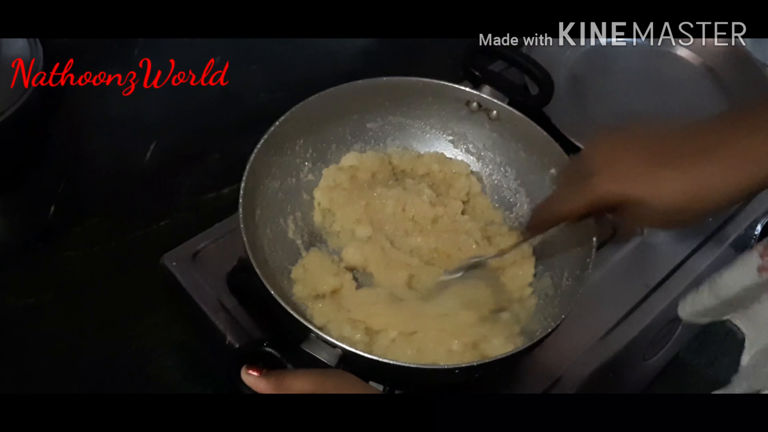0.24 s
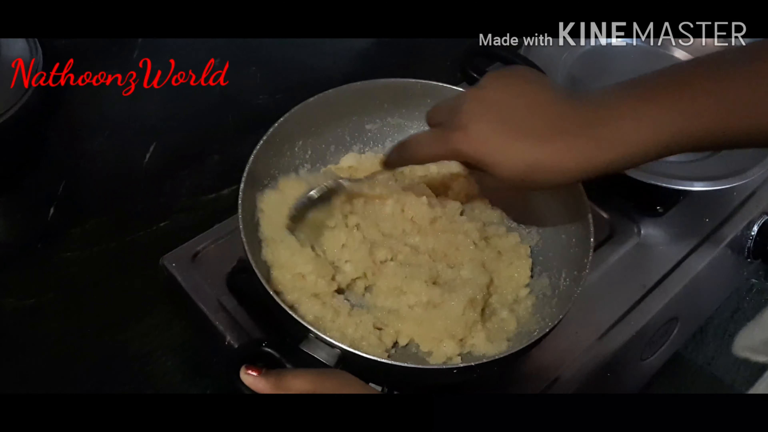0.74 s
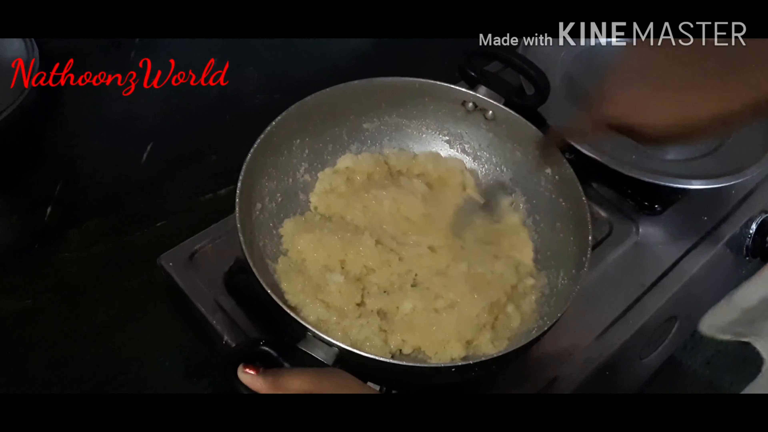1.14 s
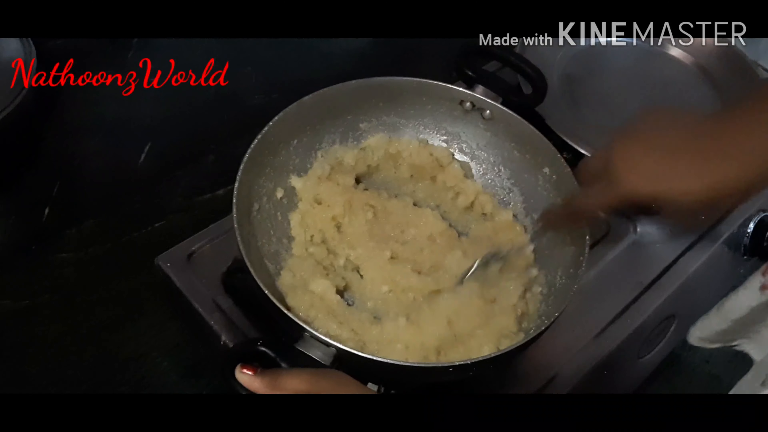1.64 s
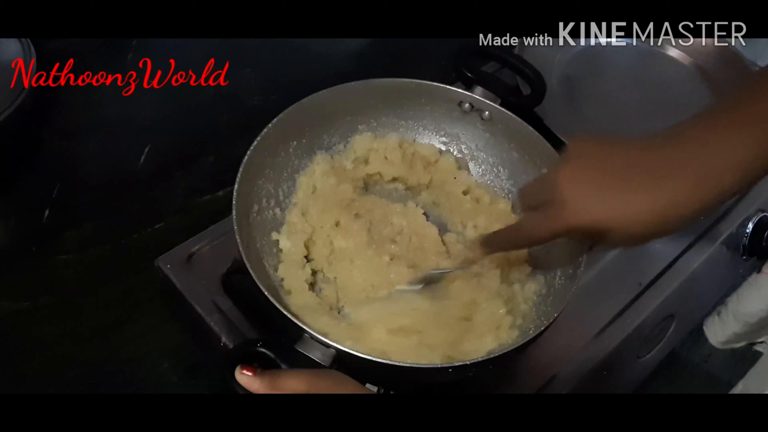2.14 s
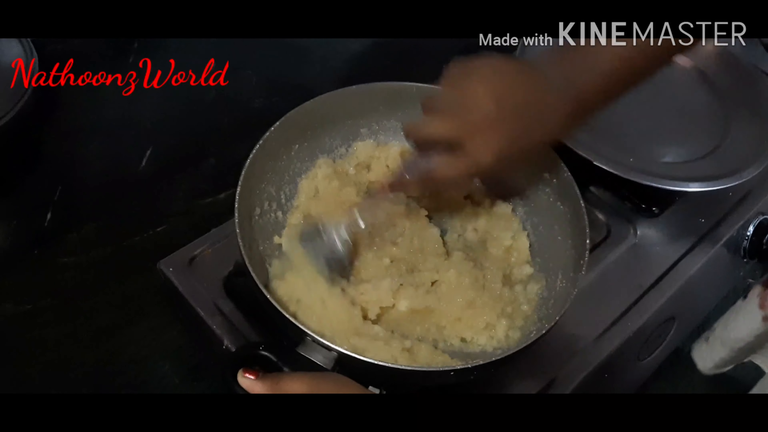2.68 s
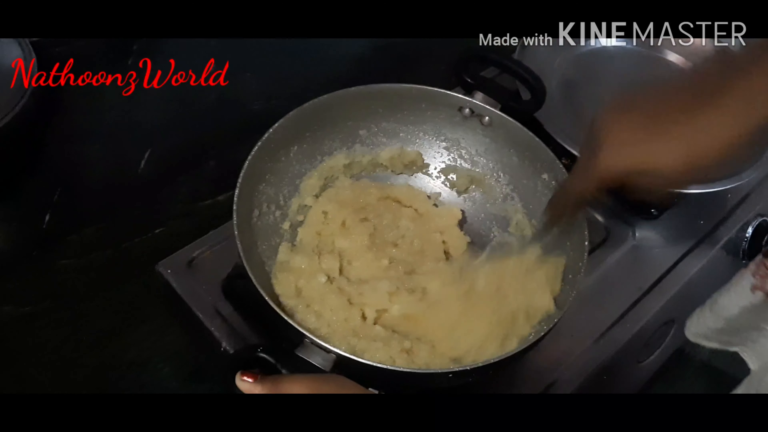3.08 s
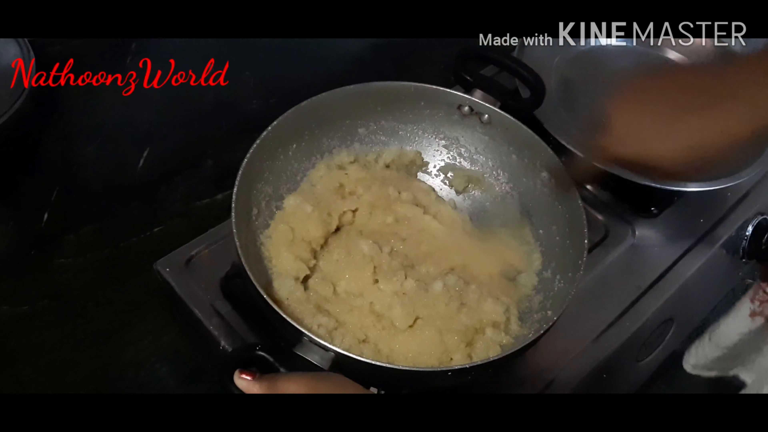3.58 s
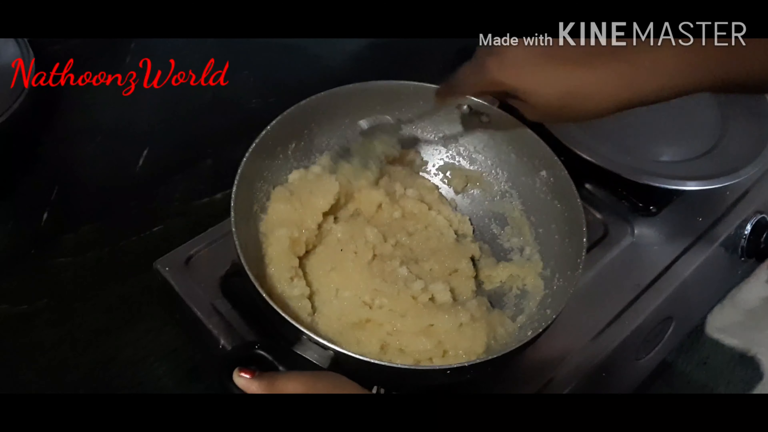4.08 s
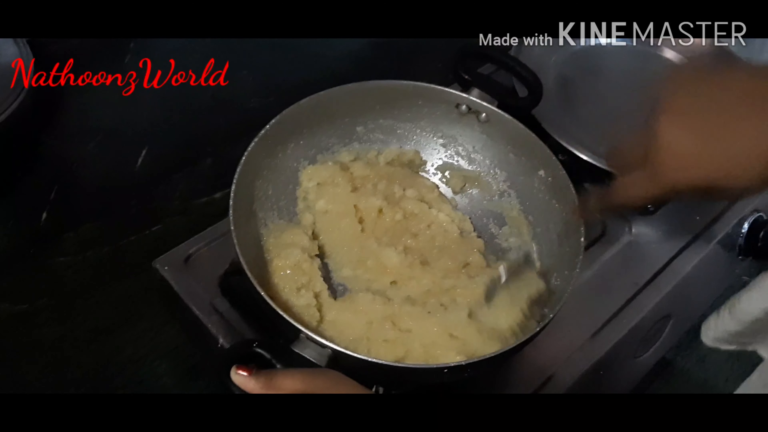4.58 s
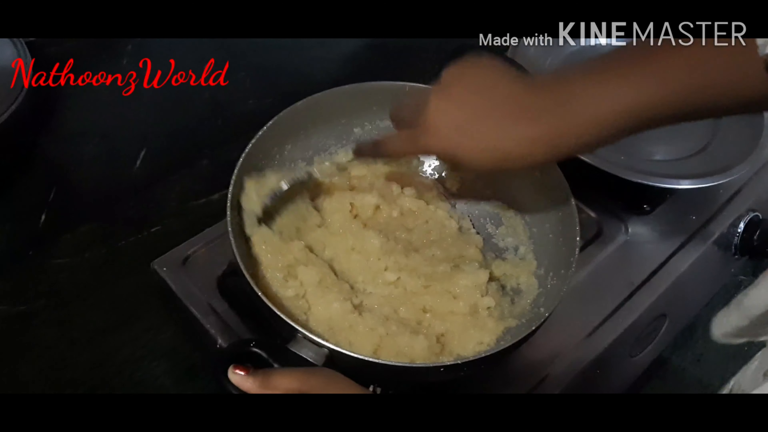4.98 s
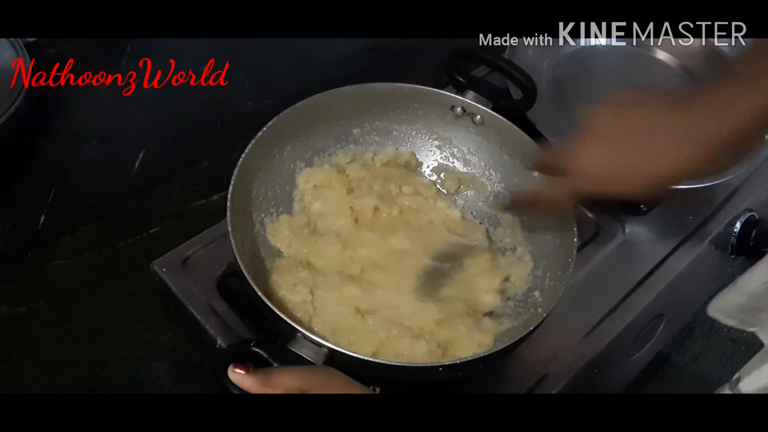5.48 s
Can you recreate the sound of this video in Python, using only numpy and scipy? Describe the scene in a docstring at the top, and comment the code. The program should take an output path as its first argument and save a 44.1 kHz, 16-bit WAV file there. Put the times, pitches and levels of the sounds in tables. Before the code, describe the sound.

A metal spoon briskly stirs thick, sticky semolina in a metal pan, recorded close in stereo in a small hard kitchen. Uneven pushes come three or four a second throughout: a dull knock with a faint metallic click, then a mid-pitched rasp, a muffled drag of paste and fine grit, swelling and easing off. The damped pan gives short, muted ringing. A firm knock lands at 0.5 s with a brief squawk; a tiny bright clink sits at 1.1 s, toward the right. The hardest knock comes at about 2.45 s. Rough judders squeak near 2.9 s, with small wet snaps at 3.0 and 3.35 s. Around 4.3 s the pan shifts with low thuds and a heavy knock; another snap follows at 4.4 s. Strong scraping strokes come at 4.7, 5.1 and 5.4 s. Dense short echoes, faint steady hiss and a barely audible low rumble lie underneath.

```python
"""Stirring thick semolina in a pan

A metal spoon stirs thick semolina in a pan on a kitchen stove, in uneven pushes, three or four a second.
Coloured noise bursts make the knocks, random tiny slips the rasp, drag and grit, wavering tones the judders.
These also ring the pan's damped modes; paste snaps and one bright clink skip the pan's ring.
All of them share the dense echoes of a small hard kitchen; faint room noise and a low rumble lie around."""
import sys
import numpy as np
from scipy import signal
from scipy.fft import rfft, irfft, next_fast_len
from scipy.io import wavfile
from scipy.ndimage import uniform_filter1d

SR = 44100
rng = np.random.default_rng(int(sys.argv[2]) if len(sys.argv) > 2 else 0)


def transcribe(u):
    """Save the signal u as a 16-bit wav file named by the first command-line argument.

    u: samples, shape (n,) or (channels, n), limited to [-1, 1]; the rate is SR.
    q: integer samples, one column per channel.
    """
    v = np.clip(np.atleast_2d(u).T, -1, 1)
    q = np.round(v * 32767).astype(np.int16)
    wavfile.write(sys.argv[1], SR, q)


N = 252379  # length in samples


def amp(db):
    """Turns decibels into a gain."""
    return 10 ** (np.asarray(db) / 20)


def evened(x):
    """Scales a sound to an rms of 1."""
    return x / np.sqrt(np.mean(x ** 2) + 1e-20)


def read(points, hz):
    """Reads a table of (frequency, value) between its points, on a log-frequency axis."""
    table_hz, value = np.transpose(points)
    return np.interp(np.log(hz + 1), np.log(table_hz + 1), value)


def sides(db):
    """Left and right gains for a level difference, left minus right."""
    return amp(np.array([[0.5], [-0.5]]) * db)


def add(mix, start_s, sound):
    """Mixes a stereo sound in at a given time, cut off at the end of the scene."""
    part = mix[:, max(round(start_s * SR), 0):][:, :sound.shape[1]]
    part += sound[:, :part.shape[1]]


def colour(x, points, size=2048):
    """Filters with the given spectrum; minimum phase, so nothing sounds ahead of its cause."""
    log_gain = np.log(amp(read(points, abs(np.fft.fftfreq(size, 1 / SR)))))
    taps = np.fft.ifft(np.exp(np.conj(signal.hilbert(log_gain)))).real
    return signal.oaconvolve(x, taps[None, :size // 2], axes=1)[:, :x.shape[1]]


def resonate(x, hz, width_hz):
    """One resonance with a gain of about 1 at its peak; a wider one dies faster."""
    r = np.exp(-np.pi * abs(width_hz) / SR)
    pole = r * np.exp(2j * np.pi * hz / SR)
    return 2 * signal.lfilter([1 - r], [1, -pole], x).real


def wander(rate_hz):
    """Smooth random movement with an rms of 1, mostly slower than the given rate."""
    hz = np.fft.rfftfreq(N, 1 / SR)[:4096]
    size = next_fast_len(N)
    spectrum = rfft(rng.standard_normal(size))[:len(hz)]
    return evened(irfft(spectrum / (1 + (hz / rate_hz) ** 4), size)[:N])


# How alike the two microphones hear noise.
# Each row: frequency in Hz, left-right correlation from 0 to 1.
LIKENESS = [(50, 0.083), (250, 0.98), (500, 0.87), (1000, 0.4), (2000, 0), (4000, 0), (15000, 0.0037)]


def pair_noise(size):
    """Noise at two microphones: alike in most of the bass, almost unrelated in the treble."""
    full = next_fast_len(size)
    a, b = rfft(rng.standard_normal((2, full)))
    same = np.clip(read(LIKENESS, np.fft.rfftfreq(full, 1 / SR)), -1, 1)
    left = same * a + np.sqrt(1 - same ** 2) * b
    return irfft(np.array([left, a]), full)[:, :size]


def burst(rise_s, size=2048):
    """A brief clatter of contact: noise that swells to its height in rise_s and dies."""
    u = np.arange(size) / SR / rise_s
    return u * np.exp(1 - u) * pair_noise(size)


# Spectrum of the room noise. Each row: frequency in Hz, relative level in dB per Hz.
QUIET_SPECTRUM = [(20, -29), (55, -49.5), (120, 3), (400, 3), (1200, 5), (2500, 2), (4000, -1), (4700, 1.5),
                  (6000, -13), (15000, -4.5)]


def room_quiet():
    """Faint steady room noise: coloured noise at one level."""
    return amp(-61) * evened(colour(pair_noise(N), QUIET_SPECTRUM))


# Spectrum of the rumble. Each row: frequency in Hz, relative level in dB per Hz.
RUMBLE_SPECTRUM = [(15, 4), (32, -43), (55, 13), (85, -5.5), (150, -29), (400, -45)]
# Swells of the rumble.
# Each row: middle in seconds, time from the middle to 1/e of the height in seconds, level in dB.
RUMBLE_SWELLS = [(1.0, 0.054, -56), (1.22, 0.11, -67), (1.58, 0.081, -63)]
RUMBLE_REST_DB = -73  # always present under the swells


def low_rumble():
    """A soft low rumble: deep noise that comes up in a few bell-shaped swells."""
    t = np.arange(N) / SR
    swell = amp(RUMBLE_REST_DB)
    for middle_s, half_s, db in RUMBLE_SWELLS:
        swell = swell + amp(db) * np.exp(-((t - middle_s) / half_s) ** 2)
    return swell * evened(colour(pair_noise(N), RUMBLE_SPECTRUM))


# How long the kitchen's echoes last. Each row: frequency in Hz, time to fall by 60 dB in seconds.
KITCHEN_DECAY = [(200, 0.67), (530, 0.34), (1400, 0.44), (3700, 0.42), (9700, 0.34), (15000, 0.46)]


def kitchen(x, first_s=0.0013):
    """Dense echoes from hard, close walls: noise in which each band dies at its own speed."""
    hz, t, bands = signal.stft(pair_noise(SR * 3 // 4), SR, nperseg=256)
    fall = amp(-60 * t / read(KITCHEN_DECAY, hz)[:, None])
    tail = signal.istft(bands * fall, SR, nperseg=256)[1]
    # silent up to first_s, full strength at twice that time
    tail *= np.clip(np.arange(tail.shape[1]) / SR / first_s - 1, 0, 1)
    tail /= np.linalg.norm(tail, axis=1, keepdims=True)
    return signal.oaconvolve(x, tail, axes=1)[:, :N]


# Spectrum of fine hard contact, also used for clicks and snaps.
# Each row: frequency in Hz, relative level in dB per Hz.
GRIT_SPECTRUM = [(300, -78), (1500, -13), (3000, 1), (4200, -1.5), (6000, -3.5), (7200, -6), (9000, -7),
                 (15000, -11)]
# Small wet snaps. Each row: start in seconds, level in dB before colouring and halving.
SNAPS = [(3.03, -18.5), (3.352, -28.5), (4.431, -22.5), (4.648, -46)]


def paste_snaps():
    """Small snaps of sticky paste: short bright bursts of noise."""
    out = np.zeros((2, N))
    for start_s, db in SNAPS:
        add(out, start_s, amp(db) * colour(burst(rise_s=0.0019), GRIT_SPECTRUM) / 2)
    return out


# Tones of the clink.
# Each row: frequency in Hz, envelope height in dB before panning, rise and decay time in seconds.
CLINK_TONES = [(3450, -23, 0.0008), (4100, -35, 0.00099), (2120, -30, 0.0013)]


def bright_clink():
    """One short bright clink: a few quickly dying tones, stronger on the right."""
    out, t = np.zeros((2, N)), np.arange(1024) / SR
    clink = np.zeros(1024)
    for hz, db, decay_s in CLINK_TONES:
        envelope = t / decay_s * np.exp(1 - t / decay_s)
        clink += amp(db) * envelope * np.sin(2 * np.pi * hz * t)
    add(out, 1.1035, sides(-6) * clink)
    return out


# Spectrum of a thud. Each row: frequency in Hz, relative level in dB per Hz.
THUD_SPECTRUM = [(15, -36), (70, -16), (130, -9), (230, -6.5), (450, 2.5), (900, -51)]
# Shifts of the pan. Each row: start in seconds, level in dB before a 19.5 dB cut and the pan's ring.
THUDS = [(1.485, -35), (4.276, -26.5), (4.318, -24), (4.352, -26.5)]


def pan_thuds():
    """The pan shifts on the burner with a low thud: a burst of dull noise."""
    out = np.zeros((2, N))
    for start_s, db in THUDS:
        add(out, start_s, amp(db - 19.5) * evened(colour(burst(rise_s=0.0043), THUD_SPECTRUM)))
    return out


# Pressed hard, the edge sticks and slips in short rough squawks.
# Each row: middle in seconds, a third of the whole length in seconds, pitch in Hz,
# level in dB before the pan's ring, roughness from 0 to 1.
JUDDERS = [(0.583, 0.025, 978, -24, 0.26), (1.25, 0.019, 2410, -33.5, 0.84), (1.344, .025, 1500, -37, .8),
           (1.836, 0.018, 2200, -33.5, .7), (2.117, 0.026, 1400, -39, .8), (2.92, .035, 1397, -31.5, 0.87),
           (2.967, 0.029, 1224, -30, 0.21), (3.257, .035, 1136, -38, .33), (3.631, 0.018, 2076, -35, 0.58),
           (3.799, 0.019, 1146, -27.5, 0.41), (3.861, 0.019, 597, -34.5, 0.27),
           (4.723, 0.036, 1180, -27, 0.28), (5.465, 0.013, 1147, -32.5, 0.38),
           (5.567, 0.029, 2165, -33, .6)]


def judders(jitter=0.3058, shimmer_db=2.0, octave_db=-13, lag_rad=0.65):
    """Stick and slip at an uneven rate: a wavering tone with a weak octave, out of step left and right."""
    out, t = np.zeros((2, N)), np.arange(N) / SR
    unsteady = wander(rate_hz=422)
    grip = evened(amp(shimmer_db * wander(rate_hz=325)))
    for middle_s, third_s, hz, db, rough in JUDDERS:
        on = abs(t - middle_s) < 1.5 * third_s
        pitch = hz * np.exp(jitter * rough * unsteady[on])
        phase = 2 * np.pi * np.cumsum(pitch) / SR + np.array([[0], [lag_rad]])
        tone = evened(np.sin(phase) + amp(octave_db) * np.sin(2 * phase))
        fade = signal.windows.tukey(on.sum(), 2 / 3)
        out[:, on] += amp(db) * tone * grip[on] * fade
    return out


# Spectrum of the dull knock. Each row: frequency in Hz, relative level in dB per Hz.
KNOCK_SPECTRUM = [(15, -56), (150, -23), (280, -17.5), (380, -4.5), (600, -5), (1000, -5), (1400, -2.5),
                  (2300, -1), (3200, -7.5), (5000, -17), (10000, -32)]
# The spoon strikes the pan.
# Each row: start in seconds, level in dB before a 24 dB cut and the pan's ring, hard click in dB
# against the knock before a 14.5 dB lift, main tone of the spot struck in Hz.
KNOCKS = [(0.037, -17, -14, 600), (0.144, -11, -21, 850), (0.529, -5.5, -18.5, 1020),
          (0.859, -11.5, -21, 670), (1.159, -17, -15.5, 630), (1.511, -12.5, -33, 578),
          (2.076, -19.5, -22, 970), (2.447, 1, -22, 1650), (2.727, -21.5, -23, 700), (2.759, -25, -12, 830),
          (3.46, -19.5, -14, 1980), (3.594, -26, -14, 2330), (3.622, -20.5, -11, 2090),
          (3.745, -15, -15, 900), (4.212, -12, -14.5, 660), (4.314, -17, -40, 467), (4.351, -4, -20.5, 620),
          (4.677, -16, -17, 1040), (5.007, -10, -22.5, 780), (5.124, -4.5, -26, 670),
          (5.422, -2.5, -18.5, 1020)]


def knocks(tone_width_hz=800, tone_db=-3, crack_db=-3):
    """The spoon lands through the paste: a dull knock, the tone of that spot, and a click of bare metal."""
    out = np.zeros((2, N))
    for start_s, db, click_db, hz in KNOCKS:
        blow = colour(burst(rise_s=0.0014), KNOCK_SPECTRUM)
        tone = resonate(resonate(blow, hz, tone_width_hz), hz, tone_width_hz)
        knock = evened(evened(blow) + amp(tone_db) * evened(tone))
        # a sharp crack, 1 ms late, inside a softer clatter
        crack = evened(np.roll(burst(rise_s=0.0003), SR // 1000, axis=1))
        clatter = evened(burst(rise_s=0.004))
        click = evened(colour(clatter + amp(crack_db) * crack, GRIT_SPECTRUM))
        add(out, start_s, amp(db - 24.0) * (knock + amp(click_db + 14.5) * click))
    return out


# The spoon is pushed through the paste.
# Each row: start in seconds, time pressing harder in seconds, time easing off in seconds,
# rasp of the edge on metal in dB, dull drag of the paste in dB against the rasp,
# fine grit in dB against the rasp. All levels are at full pressure, before the trims in scrape().
PUSHES = [(.045, 0.042, 0.071, -42.5, -2, -9), (0.144, 0.073, 0.079, -28, -6, -7.5),
          (.532, 0.052, 0.13, -27.5, -7, -11.5), (0.869, 0.09, 0.079, -31.5, -7.5, -13),
          (1.162, 0.17, 0.11, -29.5, -5.5, -9), (1.5, 0.074, 0.18, -28, -9, -11.5),
          (1.711, 0.17, 0.17, -31.5, -5.5, -7), (2.076, 0.062, 0.11, -32, -4.5, -10),
          (2.45, 0.013, 0.3, -28, -6, -12), (2.724, 0.02, 0.18, -33, -1.5, -10),
          (2.81, 0.14, 0.098, -27, -11.5, -9), (3.069, 0.11, .18, -33, -5, -10),
          (3.462, 0.029, 0.093, -38, -4.5, -6.5), (3.615, 0.14, 0.18, -32, -4, -10),
          (4.218, 0.092, 0.12, -37, -2.5, -11), (4.354, 0.012, 0.15, -27.5, -6.5, -13),
          (4.675, 0.069, 0.14, -27, -7, -9), (5.125, 0.0087, 0.14, -26.5, -9.5, -13),
          (5.425, 0.022, 0.15, -23.5, -7, -14), (5.523, 0.035, 0.081, -35, -4, -5)]
SWELL_DB, EASE_DB = 9, 21  # the pressure starts and ends this far under its height
SWELL_SHAPE, EASE_SHAPE = 1.66, 1.58  # powers of the rise and the fall: a rounded top
BITE_S, LIFT_S = 0.013, 0.021  # the edge meets and leaves the metal
# dB per dB of pressure: the paste still drags when the rasp has faded
DRAG_FOLLOWS, GRIT_FOLLOWS = 0.58, 1


def push_levels():
    """Gains of rasp, drag and grit: each push swells and eases off; all are silent while the spoon is lifted."""
    t, gains = np.arange(N) / SR, np.zeros((3, N))
    for start, rise_s, fall_s, rasp_db, drag_db, grit_db in PUSHES:
        top = start + rise_s
        end = top + fall_s
        on = (t > start) & (t < end + LIFT_S)
        before = np.clip((top - t[on]) / rise_s, 0, 1)
        after = np.clip((t[on] - top) / fall_s, 0, 1)
        pressure_db = -SWELL_DB * before ** SWELL_SHAPE - EASE_DB * after ** EASE_SHAPE
        bite, lift = (t[on] - start) / BITE_S, 1 - (t[on] - end) / LIFT_S
        touch = np.clip(np.minimum(bite, lift), 0, 1)
        layers_db = np.array([pressure_db,
                              drag_db + DRAG_FOLLOWS * pressure_db,
                              grit_db + GRIT_FOLLOWS * pressure_db])
        # where pushes overlap, the stronger one wins
        gains[:, on] = np.maximum(gains[:, on], touch * amp(rasp_db + layers_db))
    return gains


def grains(per_s, spread_db, decay_s):
    """Tiny slips at random moments, of very uneven size, each a short burst."""
    happens = rng.random(N) < per_s / SR
    size = amp(spread_db * np.minimum(rng.exponential(1, N), 4)) * happens
    power = signal.lfilter([1], [1, -np.exp(-2 / (decay_s * SR))], size ** 2)
    return evened(np.sqrt(power + 1e-12) * pair_noise(N))


def shifting(x):
    """As the point of contact travels, different bands come and go, by 3 dB rms."""
    bands = signal.stft(x, nperseg=512)[2]
    patches = rng.standard_normal(bands.shape[1:])
    for axis in (0, 1):  # smooth over frequency, then time
        patches = uniform_filter1d(patches, size=3, axis=axis)
    return signal.istft(bands * amp(3 * evened(patches)), nperseg=512)[1][:, :N]


# Spectra of the paste's drag and the metal's rasp.
# Each row: frequency in Hz, relative level in dB per Hz.
DRAG_SPECTRUM = [(40, -45), (150, -24.5), (280, -21.5), (350, -10), (520, 1), (720, 0.5), (950, -5.5),
                 (1600, -43)]
RASP_SPECTRUM = [(200, -50), (700, -0.5), (900, 5.5), (1220, 4.5), (1420, -2.5), (2000, 4), (2600, -4),
                 (3400, -12), (4500, -16), (8000, -45.5)]


def scrape():
    """The edge rasps over the metal, catches on crumbs, pushes paste ahead and rubs through fine grit."""
    rasp_gain, drag_gain, grit_gain = push_levels()
    slips = grains(per_s=2200, spread_db=2.5, decay_s=0.0011)
    crumbs = grains(per_s=320, spread_db=3.5, decay_s=0.00054)
    fine_slips = grains(per_s=4100, spread_db=2.0, decay_s=0.00049)
    rasp = evened(shifting(colour(slips + amp(-5) * crumbs, RASP_SPECTRUM)))
    drag = evened(colour(slips, DRAG_SPECTRUM))
    grit = evened(shifting(colour(fine_slips, GRIT_SPECTRUM)))
    lumps = amp(1.1 * wander(rate_hz=70))  # lumps make the pressure uneven
    metal_and_paste = amp(-2.5) * (rasp_gain * rasp + drag_gain * drag)
    return lumps * (metal_and_paste + amp(2.0) * grit_gain * grit)


# Modes of the filled pan.
# Each row: frequency in Hz, width in Hz, level in dB over its broad response, left-right difference in dB.
PAN_MODES = [(328.1, 5.9, 8, 2.5), (373.5, 8.4, 0, 6), (455.5, 4.7, 2, 6), (562, 25.4, 1, -1.5),
             (806, 41, -21, -35), (949, 20, -5.5, -11.5), (1116, 6.4, -1.5, -9), (1265, 57, -3, 0),
             (1527, 32, -4, -20), (1700, 5.4, -1, 3), (2010, 37, -8, 12), (2408, 19, 0.5, 9.5),
             (3490, 180, -6.5, 8), (5860, 480, -8, -13.5), (7770, 160, -2, -6)]


def pan_ring(x):
    """What touches the pan is heard directly and also rings its damped modes; the paste keeps them short."""
    t = np.arange(SR // 3) / SR
    response = np.zeros((2, len(t)))
    response[:, 0] = 1  # the direct sound
    for hz, width_hz, db, lean_db in PAN_MODES:
        strength = amp(db) * 2 * np.pi * width_hz / SR
        mode = np.exp(-np.pi * width_hz * t) * np.cos(2 * np.pi * hz * t)
        response += sides(lean_db) * strength * mode
    return signal.oaconvolve(x, response, axes=1)[:, :N]


def scene(drift_hz=0.7005):
    """Spoon and pan close by, in the echoes and quiet of the kitchen."""
    touching = scrape() + judders() + knocks() + pan_thuds()
    near = pan_ring(touching) + paste_snaps() + bright_clink()
    # arm and pan move, so the pattern of echoes changes: two sets of echoes trade places
    turn = 2 * np.pi * drift_hz * np.arange(N) / SR
    echoes = kitchen(near * np.cos(turn)) + kitchen(near * np.sin(turn))
    return near + amp(-3.0) * echoes + room_quiet() + low_rumble()


# Difference in colour between the microphones. Each row: frequency in Hz, left-right difference in dB.
MICROPHONE_LEAN = [(60, -6.5), (400, -4.5), (700, -4.5), (1300, -2), (2000, -2.5), (2800, 3), (3700, -3),
                   (5000, -1), (9000, 2), (15000, 2)]
EDGE_HZ = 15600  # upper band limit


def record(dry):
    """The two microphones differ in colour; then a low-pass filter limits the band."""
    size = next_fast_len(N + 4096)
    lean = sides(read(MICROPHONE_LEAN, np.fft.rfftfreq(size, 1 / SR)))
    heard = irfft(rfft(dry, size) * lean, size)[:, :N]
    low_pass = signal.firwin(161, EDGE_HZ, window=("kaiser", 9), fs=SR)
    return signal.oaconvolve(heard, low_pass[None], "same")


dry = scene()
out = record(dry)
transcribe(out)
```